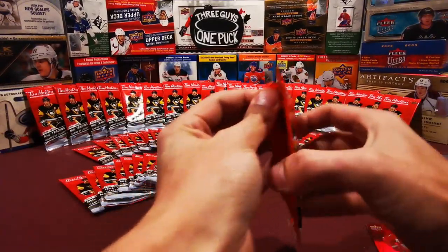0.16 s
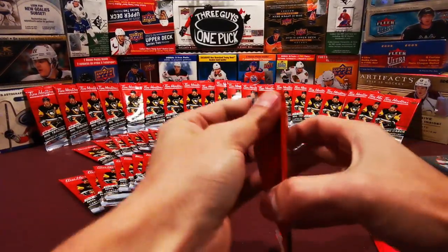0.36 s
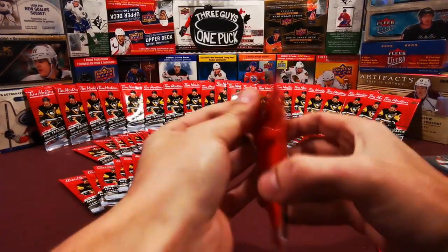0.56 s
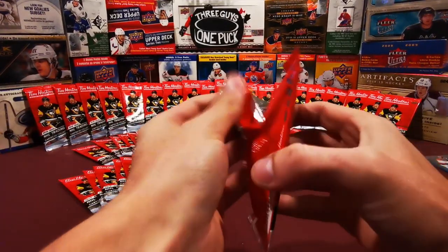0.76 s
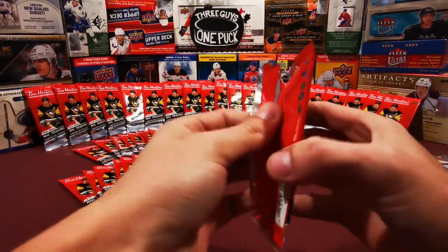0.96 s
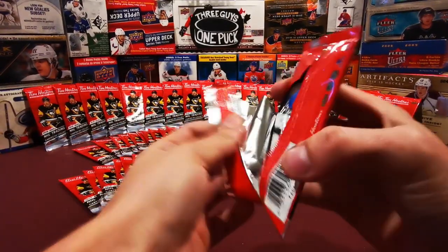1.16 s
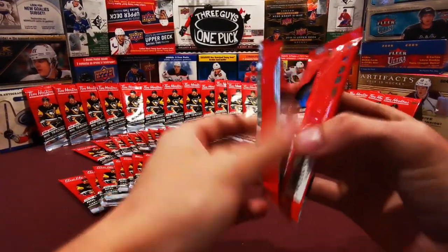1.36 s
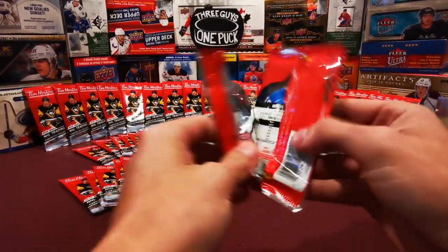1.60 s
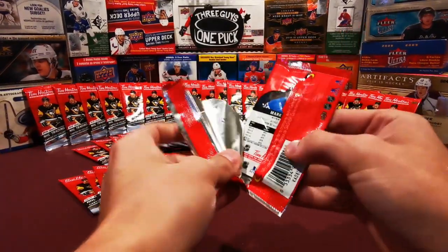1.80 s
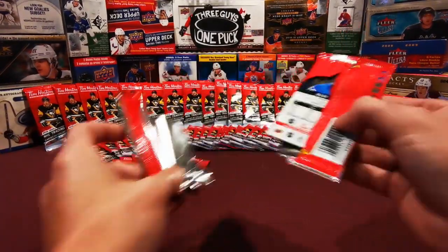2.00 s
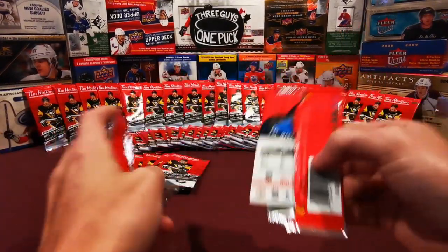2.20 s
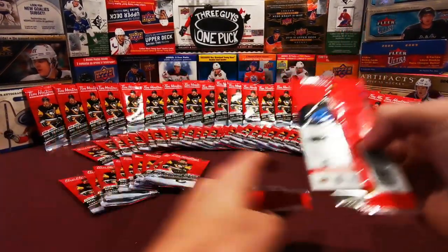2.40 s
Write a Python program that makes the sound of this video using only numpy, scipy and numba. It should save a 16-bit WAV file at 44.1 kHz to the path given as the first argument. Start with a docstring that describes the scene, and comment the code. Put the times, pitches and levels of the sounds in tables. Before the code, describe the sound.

Close, dry foil crinkling as fingers tear a wrapper, with sharp snaps and fine ticking, strongest near half a second and again before two seconds, then a soft knock; quiet small room, stereo phone.

```python
"""A foil card pack is pulled open by hand, close to a phone in a small furnished room.
Each crease snaps as a short volley of clicks that ring small patches of foil, and then keeps ticking.
Flexed panels ring on their own pitch, and a fine crackle of small clicks follows the pull.
Fingers and wrapper tap the table with short decaying sines; filtered noise makes the room's tail,
the table rumble, the mains hum and the room air."""
import sys
import numpy as np
from scipy import signal
from scipy.fft import rfft, irfft
from scipy.io import wavfile
from scipy.ndimage import uniform_filter1d
from numba import njit

SR = 44100
rng = np.random.default_rng(int(sys.argv[2]) if len(sys.argv) > 2 else 0)


def dump(signal):
    """Clip the signal to [-1, 1] and save it as 16-bit WAV at the path in sys.argv[1]."""
    limited = np.clip(np.atleast_2d(signal).T, -1, 1)
    pcm = np.round(limited * 32767).astype(np.int16)
    wavfile.write(sys.argv[1], SR, pcm)


def gain_from_db(level_db):
    """Turn a decibel level (scalar or array-like) into a linear amplitude factor."""
    decades = np.asarray(level_db, float) / 20
    return 10 ** decades


N = 108045  # length of the scene in samples


@njit
def rings(start, hz, fade, size, n):
    """Add up short sines that swell within about a cycle and then die away, like small struck things."""
    out = np.zeros(n)
    for k in range(len(start)):
        # one complex multiplication per sample turns the phase and shrinks the ring
        turn = np.exp(fade[k] + 2j * np.pi * hz[k] / SR)
        settle = np.exp(-3 * hz[k] / SR)
        ring, not_risen, first = size[k] + 0j, 1., int(start[k])
        last = min(n, first + int(-5 / fade[k]))
        for j in range(max(first, 0), last):
            out[j] += ring.imag * (1 - not_risen)
            ring, not_risen = ring * turn, not_risen * settle
    return out


def fade_per_sample(hz, cycles):
    """A ring fades by a factor of e to the pi (27 dB) over this many cycles."""
    return -np.pi * hz / SR / cycles


def unit(x):
    """Scale to an rms of 1."""
    return x / np.sqrt(np.mean(x ** 2))


def band(x, hz, octaves):
    """Keep a band this many octaves wide around hz."""
    edges = np.clip([hz * 2 ** (-octaves / 2), hz * 2 ** (octaves / 2)], 5, .49 * SR)
    return signal.sosfilt(signal.butter(2, edges, "bandpass", fs=SR, output="sos"), x)


def high_pass(x, hz):
    """Keep what lies above hz."""
    return signal.sosfilt(signal.butter(2, hz, "highpass", fs=SR, output="sos"), x)


def curve(table, column):
    """Draw one column of a time table as a line with a value for every sample."""
    rows = np.array(table)
    return np.interp(np.arange(N) / SR, rows[:, 0], rows[:, column])


def sway(x):
    """Keep the wandering pitch of a narrow noise but even out its strength."""
    phase = np.angle(signal.hilbert(x))
    return unit(np.cos(phase))


LOW_HZ, MID_HZ, HIGH_HZ = 1350, 3240, 8000  # where the low, middle and high levels apply in full
PATCH_SCATTER = 0.1  # spread of pitch, as a natural logarithm
PATCH_SCATTER_DB, PATCH_LATE_S = 4.5, .0004
# patches of foil that every click rings: [f/Hz before scatter, relative level/dB, fade length/cycles]
FOIL_PATCHES = [(370, -16.5, 1.24), (674, -9.5, 2.76), (1208, -6.5, 5.7), (1560, -0.5, 2.64),
                (2446, -0.5, 4.8), (4200, -2, 10.2), (5840, -1.5, 10.1), (7170, 3.5, 4.9), (8850, 0.5, 10),
                (10570, -2, 6.6), (12500, -7, 12.6)]


def clicks(s, low_db, mid_db, high_db):
    """Each click rings all the patches, each a little off in pitch, strength and moment."""
    hz, patch_db, cycles = np.array(FOIL_PATCHES).T
    chance = rng.standard_normal((len(s), 3, len(hz)))
    f = np.minimum(hz * np.exp(PATCH_SCATTER * chance[:, 0]), .4 * SR)
    # a patch between two of the three pitches blends their levels
    place = np.interp(np.log(hz), np.log([LOW_HZ, MID_HZ, HIGH_HZ]), [-1, 0, 1])
    db = np.outer(low_db, np.maximum(-place, 0))
    db = db + np.outer(mid_db, 1 - abs(place))
    db = db + np.outer(high_db, np.maximum(place, 0))
    # the third draw sets both the direction of the first swing and the delay
    size = gain_from_db(db + patch_db + PATCH_SCATTER_DB * chance[:, 1]) * np.sign(chance[:, 2])
    start = (s[:, None] + PATCH_LATE_S * abs(chance[:, 2])) * SR
    return rings(start.ravel(), f.ravel(), fade_per_sample(f, cycles).ravel(), size.ravel(), N)


VOLLEY_S, VOLLEY_FADE_DB = .0011, 1  # mean delay of the later clicks; weakening per mean delay
# snapping creases: [t/s, low-patch level/dB, middle-patch level/dB, high-patch level/dB,
# level/dB of the later ticking relative to the snap]; levels are before each patch's own level
CREASE_SNAPS = [(0.083, -46.5, -46.5, -50, -20), (0.1081, -46, -44, -48, -5),
                (0.1243, -44, -41.5, -40, -8.5), (0.1636, -48, -51, -39, -9), (0.1902, -60, -45, -45, 0),
                (0.1979, -31, -35.5, -41, -10.5), (0.2063, -40.5, -38.5, -33.5, -17),
                (0.306, -45, -54.5, -41, 0), (0.375, -37.5, -36.5, -33, -8.5),
                (0.3843, -32.5, -35, -32, -28), (0.4269, -40, -41, -35, -6.5),
                (0.4391, -27.5, -38, -44, -9), (0.4457, -32, -26.5, -26, -14),
                (0.4478, -34, -26, -23, -6.5), (0.471, -59, -31.5, -31, -2.5),
                (0.4792, -38, -39, -32.5, -2.5), (0.5045, -43, -45, -36, -7.5),
                (0.5124, -44, -32.5, -55, -8), (0.5332, -51, -41, -44.5, -3),
                (0.5964, -60, -51, -43.5, -12), (0.654, -41, -42.5, -44, 0.5),
                (0.6634, -43, -33.5, -34.5, -6), (0.7069, -52, -40, -44.5, -8),
                (0.7375, -62, -44.5, -45, -5), (0.778, -40, -42.5, -41.5, -6.5),
                (0.8212, -47, -47, -48, -3), (0.848, -72, -42, -41.5, -16),
                (0.8648, -48, -49.5, -48.5, -16), (0.888, -44.5, -47, -52, -7),
                (0.9197, -39.5, -48, -31.5, 5.5), (0.9266, -36.5, -32, -38, -13),
                (0.9331, -31.5, -33, -31, -7.5), (0.9459, -36, -45, -43, -17),
                (0.9753, -31, -23, -31, -12.5), (0.9915, -38, -36, -54, -13),
                (1.0085, -44, -34.5, -35.5, -17), (1.0652, -44, -41, -41, 0),
                (1.1106, -33.5, -31.5, -33, -9), (1.19, -45, -37.5, -45.5, -13),
                (1.2528, -47.5, -46, -35.5, -10), (1.2838, -48, -36, -37, -3.5),
                (1.298, -40, -41, -57, -18), (1.3138, -42, -30, -34.5, -11), (1.354, -54, -42, -32, -16),
                (1.3865, -33, -31.5, -43, -7), (1.399, -53, -41.5, -31.5, -9),
                (1.4648, -45.5, -50, -48.5, 2), (1.4824, -48.5, -39.5, -39, -7.5),
                (1.501, -40.5, -43, -44, -9), (1.5847, -31.5, -39, -33, -7.5),
                (1.6659, -36, -34, -42, -16.5), (1.7444, -31.5, -41, -35, -2), (1.7584, -24, -53, -31, -10),
                (1.7605, -38.5, -36, -28, -6), (1.7757, -41.5, -47, -30.5, -2.5),
                (1.7822, -35.5, -38.5, -32, -7), (1.791, -25.5, -37.5, -33.5, -14),
                (1.933, -47, -62, -43.5, -13), (1.9485, -46.5, -54, -42, -1), (1.9611, -37, -68, -47, -8),
                (1.9959, -67, -45, -43, -8), (2.035, -40.5, -44.5, -39, -14),
                (2.07, -45.5, -40.5, -33.5, -9.5), (2.1194, -47, -46, -42, -13),
                (2.1298, -44, -47, -37, -16), (2.1769, -32.5, -32.5, -31.5, -7.5),
                (2.199, -33.5, -33.5, -35, -17), (2.334, -44.5, -53, -58.5, -14),
                (2.429, -45.5, -64, -60.5, -20)]


def snaps(count=6):
    """Each crease gives way in a volley of clicks that swells at once and then weakens."""
    s, low, mid, top, _ = np.array(CREASE_SNAPS).T[:, :, None]
    late = -np.log(1 - rng.random((len(s), count)))
    late[:, 0] = 0  # the first click comes right on time
    weaker = -VOLLEY_FADE_DB * abs(late - .5)
    moment = s + late * VOLLEY_S
    return clicks(moment.ravel(), (low + weaker).ravel(), (mid + weaker).ravel(), (top + weaker).ravel())


SETTLE_S, SETTLE_FADE_DB = .02, 3  # mean delay of a tick; weakening per mean delay


def settling(count=20):
    """After each snap the foil around the crease keeps ticking for a moment, ever more weakly."""
    s, low, mid, top, tick_db = np.array(CREASE_SNAPS).T[:, :, None]
    late = -np.log(1 - rng.random((len(s), count)))
    weaker = tick_db - SETTLE_FADE_DB * late
    moment = s + late * SETTLE_S
    return clicks(moment.ravel(), (low + weaker).ravel(), (mid + weaker).ravel(), (top + weaker).ravel())


PANEL_CYCLES = 11  # fade length
# flexed panels of the pack: [t/s, level/dB before the swell and fade, f/Hz]
FLEXED_PANELS = [(.375, -26, 1690), (0.4477, -15.5, 1534), (0.4474, -23, 4060), (.462, -24, 1480),
                 (.927, -22.5, 2130), (0.982, -24, 2500), (0.984, -33, 1157), (1.313, -31.5, 2230),
                 (1.585, -32, 1140), (1.665, -33, 1190), (2.177, -29.5, 1220)]


def panels():
    """Each flexed panel gives one short ring on its own pitch."""
    s, db, hz = np.array(FLEXED_PANELS).T
    return rings(s * SR, hz, fade_per_sample(hz, PANEL_CYCLES), gain_from_db(db), N)


CRACKLE_SPREAD_DB, CRACKLE_DB = 0.5, -2.5  # spread of the clicks; trim of the whole crackle
CRACKLE_LOW_DB, CRACKLE_HIGH_DB = 1, 0.5  # low and high patches relative to the middle
# pull of the fingers, which the crackle follows: [t/s, level/dB before the crackle's trim]
FINGER_PULL = [(0, -50), (.06, -60.5), (.13, -56), (.19, -60), (.25, -53.5), (.35, -54.5), (.48, -42.5),
               (.56, -68), (.64, -53.5), (.72, -55), (.9, -56.5), (.95, -48), (1.1, -47), (1.22, -64),
               (1.3, -53.5), (1.5, -64.5), (1.57, -55.5), (1.62, -46), (1.71, -60), (1.77, -39.5),
               (1.9, -63.5), (1.97, -53.5), (2.1, -57), (2.3, -60.5), (2.45, -72.5)]


def crackle(count=4500):
    """Small clicks of slightly differing strength at random moments, following the pull."""
    chance = rng.random((count, 2))
    db = -CRACKLE_SPREAD_DB * np.log(1 - .97 * chance[:, 1])
    moment = chance[:, 0] * N / SR
    fine = clicks(moment, db + CRACKLE_LOW_DB, db, db + CRACKLE_HIGH_DB)
    return unit(fine) * gain_from_db(curve(FINGER_PULL, column=1) + CRACKLE_DB)


TAP_CYCLES = 2.6  # fade length of knock and tick
TAP_TICK_DB, TAP_TICK_HZ = -3, 2370  # tick level relative to the knock; tick pitch
# taps of wrapper and fingers: [t/s, knock level/dB before the swell and fade, knock f/Hz]
TABLE_TAPS = [(0.081, -38.5, 237), (0.447, -26.5, 181), (1.13, -35, 290), (1.443, -34.5, 487),
              (1.766, -37, 350), (2.269, -30.5, 1280), (2.272, -23, 570), (2.333, -35.5, 810)]


def taps():
    """Each tap on the table is a quickly damped knock with a weaker tick on top."""
    s, db, hz = np.array(TABLE_TAPS).T
    f = np.r_[hz, np.full(len(hz), TAP_TICK_HZ)]
    size = gain_from_db(np.r_[db, db + TAP_TICK_DB])
    return rings(np.r_[s, s] * SR, f, fade_per_sample(f, TAP_CYCLES), size, N)


ROOM_ONSET_S = 0.0012  # time constant of the build-up
# bands of the room's tail: [f/Hz, time to fall by 60 dB/s, relative level/dB]
ROOM_TAIL = [(265, 0.17, -3), (688, 0.17, -6.5), (1256, 0.24, -4.5), (2770, 0.095, -3.5),
             (4580, 0.18, -6.5), (7240, 0.078, -5.5), (11300, 0.13, -6), (15400, 0.036, -4.5)]


def room(x):
    """Many blurred reflections: noise that builds in a few ms and dies band by band."""
    t = np.arange(SR // 2) / SR
    tail = 0
    for hz, t60, db in ROOM_TAIL:
        part = band(rng.standard_normal(len(t)), hz, 0.75)
        part = part * gain_from_db(-60 * t / t60) * (1 - np.exp(-t / ROOM_ONSET_S))
        # wider bands get more energy
        tail = tail + gain_from_db(db) * part * np.sqrt(hz / SR / np.sum(part ** 2))
    return signal.fftconvolve(x, tail)[:N]


# rumble of the table under the arms: [t/s, level/dB near 22 Hz, level/dB near 60 Hz]
TABLE_RUMBLE = [(.18, -60.5, -70), (.31, -40, -60), (.6, -52.5, -78), (.74, -55, -55), (.87, -56.5, -65),
                (1.02, -51, -61), (1.23, -51, -79), (1.6, -58.5, -69), (1.7, -65.5, -80),
                (1.83, -56, -59.5), (1.93, -58, -79), (2.33, -67, -82)]


def rumble():
    """Two narrow noises with wandering pitch stand for the shaking table."""
    deep = band(band(rng.standard_normal(N), 21.2, 1.0), 21.6, 0.86)
    upper = band(band(rng.standard_normal(N), 58.7, 0.4), 59, .4)
    deep = sway(deep) * gain_from_db(curve(TABLE_RUMBLE, column=1))
    return deep + sway(upper) * gain_from_db(curve(TABLE_RUMBLE, column=2))


def hum():
    """Mains hum as a very narrow noise, so it wavers."""
    return unit(band(rng.standard_normal(N), 119, 0.098)) * gain_from_db(-70.5)


AIR_DB = -66  # rms level of the whole
# colour of the room air: [f/Hz, relative level/dB]
AIR_COLOUR = [(115, 3.5), (250, 2.5), (500, -9.5), (1200, -17), (3000, -59), (15000, -33)]


def air():
    """A steady noise, shaped in frequency, is the quiet of the room."""
    f, rows = np.fft.rfftfreq(N, 1 / SR) + 1, np.array(AIR_COLOUR)
    colour_db = np.interp(np.log(f), np.log(rows[:, 0]), rows[:, 1])
    noise = irfft(rfft(rng.standard_normal(N)) * gain_from_db(colour_db), N)
    return unit(noise) * gain_from_db(AIR_DB)


TAP_ROOM_DB = -4  # how strongly the taps feed the room, relative to the foil
WIDE_ABOVE_HZ, ROOM_SIDE_DB = 6000, -6  # treble part of the room that differs between the ports
LEFT_LAG = 0.89  # samples between the two ports


def scene():
    """One sound field; the left port hears it a moment later, and some of the room's treble differs."""
    foil = snaps() + panels() + settling() + crackle()
    knocks = taps()
    heard = foil + knocks + room(foil + gain_from_db(TAP_ROOM_DB) * knocks)
    heard = heard + rumble() + hum() + air()
    apart = gain_from_db(ROOM_SIDE_DB) * high_pass(room(foil), WIDE_ABOVE_HZ)
    # turning the phase in step with frequency delays by a fraction of a sample
    lag = np.exp(-2j * np.pi * np.fft.rfftfreq(N) * LEFT_LAG)
    left = irfft(rfft(heard) * lag, N)
    return np.array([left + apart, heard - apart])


def top_cut(x):
    """Nothing passes above the cut-off."""
    return signal.sosfilt(signal.butter(12, 16660, fs=SR, output="sos"), x)


SIDE_THINNED_BELOW_HZ = 2350  # 3 dB down here, more towards the bass
SIDE_SPREAD_DB = 2.5  # spread of the random side level, before its steps are softened


def record(dry):
    """The side signal (left minus right) thins towards the bass, and its level changes at random."""
    mid, side = (dry[0] + dry[1]) / 2, (dry[0] - dry[1]) / 2
    f = np.fft.rfftfreq(N, 1 / SR)
    side = irfft(rfft(side) * f / np.hypot(f, SIDE_THINNED_BELOW_HZ), N)
    # a new random level every 1024 samples, with softened steps
    steps = np.repeat(rng.standard_normal(N // 1024 + 1), 1024)
    side_level = uniform_filter1d(steps, size=512)[:N]
    side = side * gain_from_db(SIDE_SPREAD_DB * side_level)
    return top_cut(np.array([mid + side, mid - side]))


dry = scene()
out = record(dry)
dump(out)
```